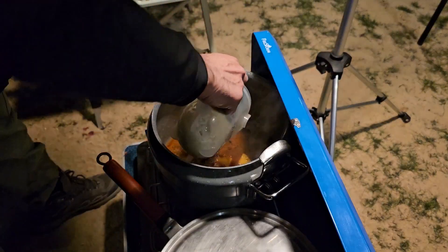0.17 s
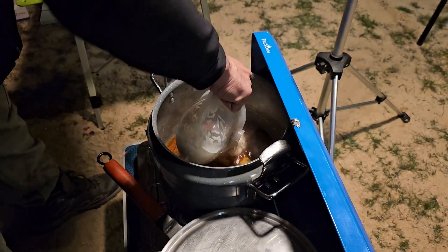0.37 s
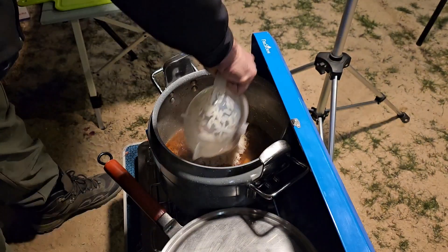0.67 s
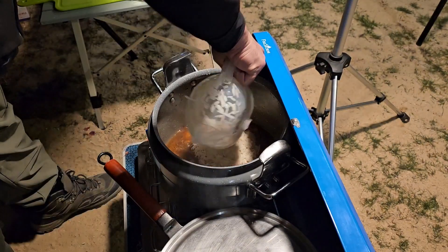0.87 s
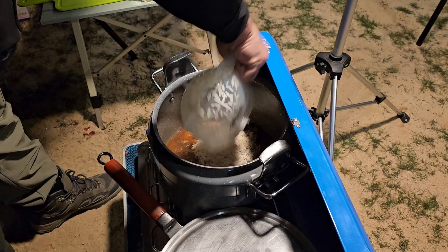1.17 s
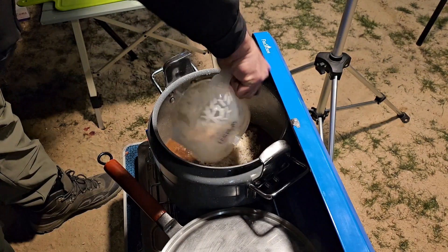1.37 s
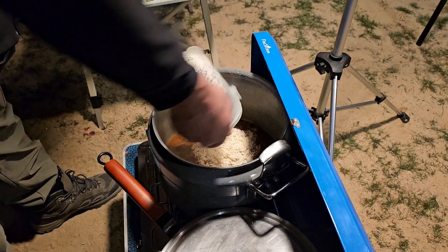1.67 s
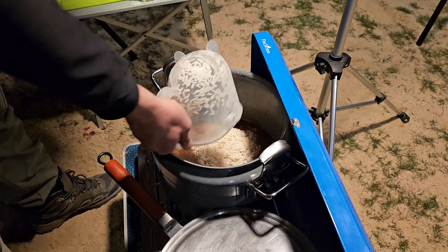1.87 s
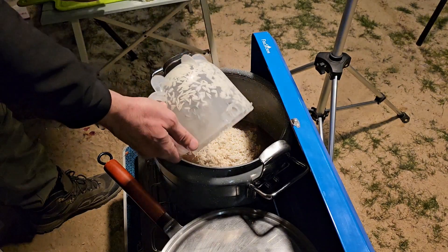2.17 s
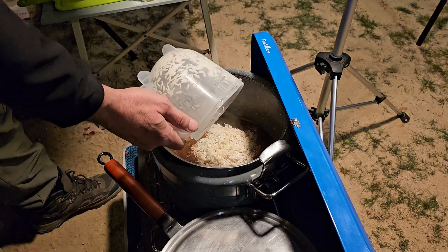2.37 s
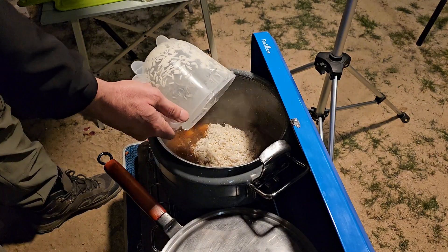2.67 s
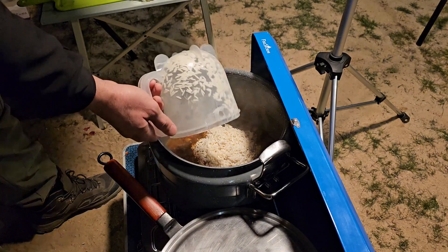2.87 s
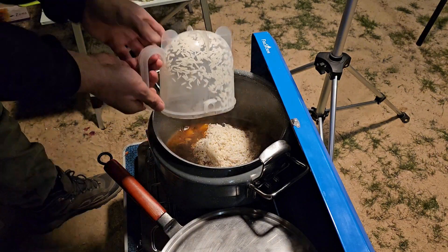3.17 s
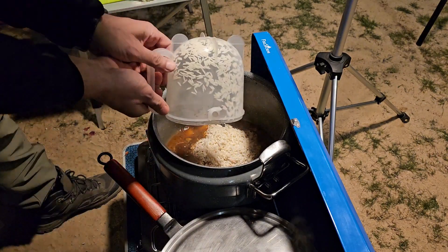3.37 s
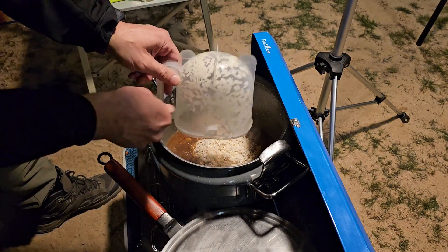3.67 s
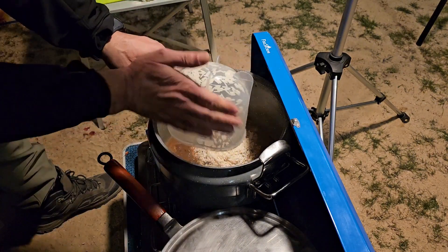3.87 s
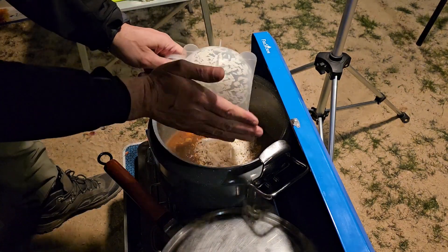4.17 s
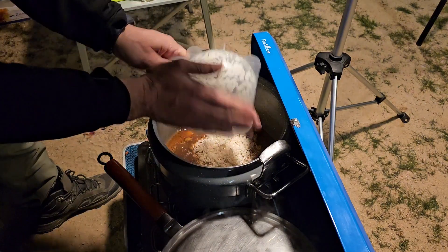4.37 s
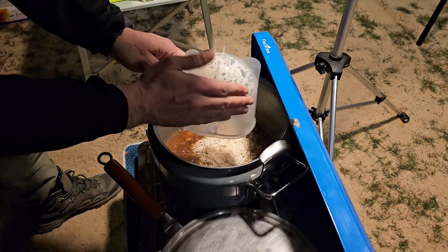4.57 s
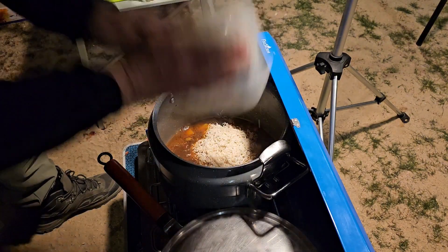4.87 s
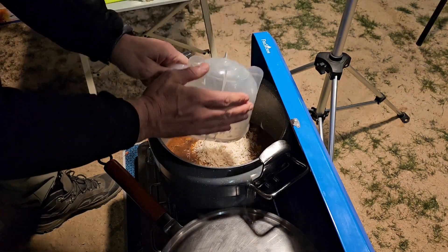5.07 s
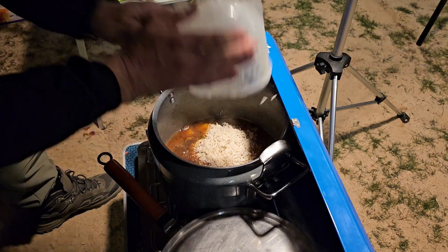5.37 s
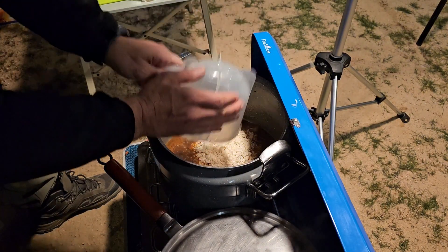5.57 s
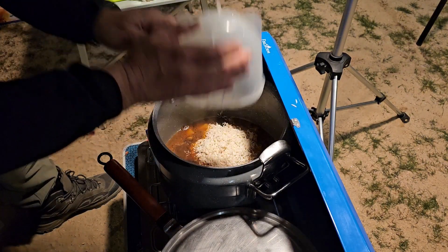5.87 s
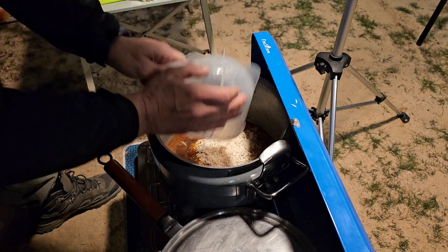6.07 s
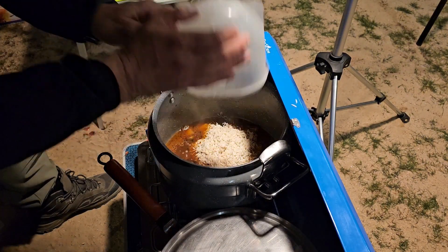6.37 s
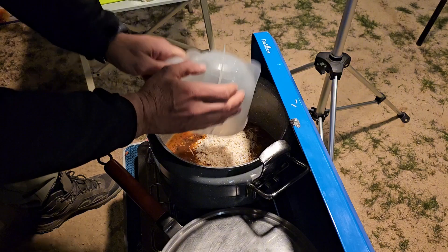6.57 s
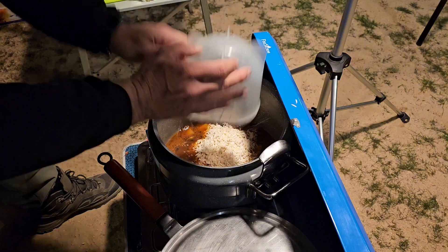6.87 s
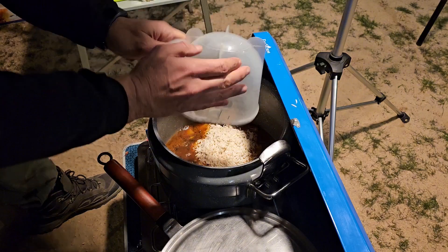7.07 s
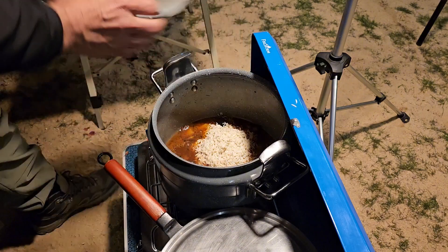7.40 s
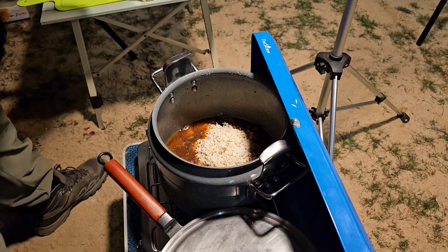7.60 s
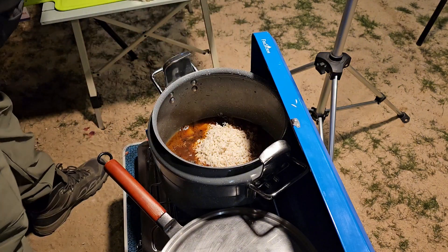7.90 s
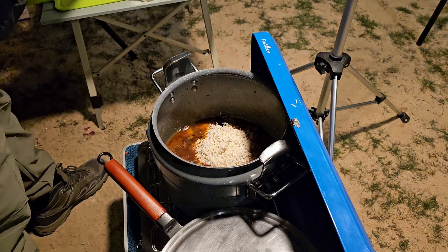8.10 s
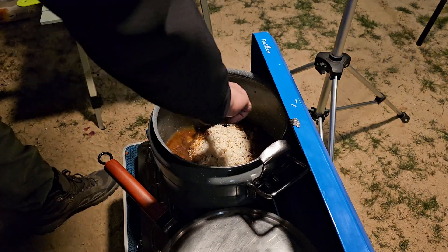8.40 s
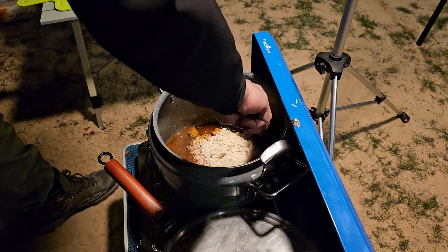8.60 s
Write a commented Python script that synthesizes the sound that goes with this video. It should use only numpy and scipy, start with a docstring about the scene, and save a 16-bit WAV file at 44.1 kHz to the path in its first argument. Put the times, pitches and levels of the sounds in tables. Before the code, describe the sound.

Close up at an outdoor camp, stew simmers with thick plops and a faint fizz. A plastic jug knocks loudly against the pot, setting it ringing, and wet rice drops in softly. The jug's handle creaks, then a palm slaps its base four times. Sleeves swish as it is shaken, and near the end a utensil clacks and clinks on the rim. A burner and a distant engine hum quietly underneath.

```python
"""An outdoor camp, a stereo microphone close to a simmering stew pot. Soaked rice goes in from a plastic
jug: the jug knocks the pot and sets it ringing, its handle creaks, and it is slapped four times on the
base and shaken. Wet rice and sleeves swish, thick bubbles plop, tiny ones fizz, and at the end a utensil
clinks on the rim. Underneath are the burner's steady flame and, far off, the hum of an engine."""
import sys
import numpy as np
from scipy import signal
from scipy.fft import rfft, irfft
from scipy.io import wavfile

SR = 44100
rng = np.random.default_rng(int(sys.argv[2]) if len(sys.argv) > 2 else 0)


def persist_wave(psi):
    """Save psi, clipped to +-1, as 16-bit WAV."""
    counts = np.round(np.clip(psi, -1, 1) * 32767).astype(np.int16)
    wavfile.write(sys.argv[1], SR, np.atleast_2d(counts).T)


N = 385434
T = np.arange(SR) / SR  # one second: the life of any single event


# jug against the pot, close up: t/s, thud level/dB, pot ring level/dB, crack level/dB
KNOCKS = [(0.4516, -1.5, -17.5, -21.5), (0.4592, -8, -46, -20.5)]
# modes of the full jug: f/Hz, level/dB, t60/s
FULL_JUG_MODES = [(258, -19, .06), (319, 0.5, 0.13), (478, 5, 0.024), (613.5, -4, 0.0954), (659, -17, 0.26),
                  (1786, -11, 0.088), (2040, -17, 0.16)]
# modes of the pot with stew in it: f/Hz, level/dB, t60/s
POT_MODES = [(266.5, 3, 0.93), (291, 4, 0.98), (517, -28, 1), (602, -5, 0.84), (650, 3.5, 0.4),
             (932, 4.5, 0.37), (995, -13.5, 0.46), (1032, 0.5, 0.61), (1190, -18, 0.25),
             (1370, -24.5, 0.89), (1518, -13.5, .37), (1571, -4, .49), (1830, -14, .7), (2093, -27, .31),
             (2160, -4.5, 0.21), (2705, -6.5, .31), (3074, -11, 0.47)]

def jug_knocks(split=0.026):
    """The full jug hits the pot and rebounds; the pot, not quite round, rings in close pairs of modes."""
    out = np.zeros((2, N))
    twins = [(hz * (1 + split * rng.uniform(-1, 1)), db + 1, t60 * 0.61) for hz, db, t60 in POT_MODES]
    for s, thud_db, ring_db, crack_db in KNOCKS:
        thud = gain_of(thud_db) * ring(FULL_JUG_MODES, rise=0.0008)
        pot = gain_of(ring_db) * ring(POT_MODES + twins, rise=0.003)
        snap = gain_of(crack_db) * crack(0.0089, after_db=-13, after_fall=0.013, tilt_db=0.1)
        add(out, s, radiated(radiated(thud + pot, 170), 170) + snap)
    return out


# palm on the jug's base: t/s, thump level/dB, wall level/dB re thump, crack level/dB
SLAPS = [(3.8567, -8, -14, -23), (4.0363, -4, -11, -15.5), (4.1976, -6.5, -6, -18), (4.3632, -5, -3.5, -16)]
# air in the jug and its base, damped by the palm: f/Hz, level/dB, t60/s
JUG_AIR_MODES = [(325, 0, 0.042)]
# the jug's walls: f/Hz, level/dB, t60/s
JUG_WALL_MODES = [(421, -24, 0.047), (482, 12.5, 0.034), (508, -3, 0.021), (664, -7, 0.096),
                  (798, -6, 0.093), (1864, -28, 0.16), (2946, -7, 0.028), (2800, -33, 0.045)]

def palm_slaps():
    """The palm drives the air and walls of the upturned jug; the pot's lowest modes answer faintly."""
    out = np.zeros((2, N))
    for s, db, wall_db, crack_db in SLAPS:
        air = ring(JUG_AIR_MODES, rise=0.004, sag=0.2, sag_s=0.021)  # flat while the palm presses
        walls = gain_of(wall_db) * ring(JUG_WALL_MODES, rise=0.0032)
        pot = gain_of(-34) * ring(POT_MODES[:5], rise=0.0053)
        recoil = gain_of(-20.5) * ring([(80.5, 0, 0.075)], rise=0.0042)  # the whole jug gives way
        thump = -gain_of(db) * (radiated(air + walls + pot, 193) + recoil)
        smack = gain_of(crack_db) * inside_pot(crack(0.0033, after_db=-11.5, after_fall=0.015))
        add(out, s, thump + smack)
        add(out, s - 0.005, gain_of(db - 23) * air)  # air squeezed ahead of the palm
    return out


# loose rice sliding over the jug's lip: t/s, level/dB
SLIDES = [(.168, -50), (.28, -47.5)]
# wet clumps landing in the pot: t/s, level/dB, fall/s
CLUMPS = [(1.089, -50, 0.015), (1.112, -33.5, .011), (1.247, -41, 0.032), (1.294, -43, 0.0096),
          (1.399, -52, .016), (3.912, -44, 0.017), (4.133, -40.5, 0.014), (4.17, -34, 0.042),
          (4.315, -42, 0.051), (4.493, -47.5, 0.0072), (4.905, -44, 0.042), (5.487, -40, 0.026),
          (5.998, -29.5, 0.018), (6.5, -45, .014), (6.86, -50.5, .012), (7.256, -43, 0.011)]
# a sleeve brushing as the arm swings: t/s, level/dB
SLEEVE_SWINGS = [(0.629, -57.5), (0.808, -57.5), (3.14, -61.5), (4.959, -49.5), (5.48, -54), (6.0, -55.5),
                 (6.48, -62), (6.831, -60.5), (7.75, -60.5), (8.54, -53)]
# spectrum of rice and cloth slipping: f/Hz, level/dB
SWISH_SPECTRUM = [(300, -30.5), (1100, -4.5), (1700, -3.5), (3200, 6.5), (5500, 5.5), (8500, 2),
                  (12000, -1.5), (15500, -2.5)]

def rice_and_sleeves(pour_from_s=1.02, pour_to_s=1.45, crumb_count=10, ticks_per_s=500):
    """Each slide, splat or swing is a cloud of tiny slips; loose grains tick on the pot and ring it."""
    swishes, lead_s = np.zeros((2, N)), 0.35
    crumbs = [(pour_from_s + (pour_to_s - pour_from_s) * (k + when) / crumb_count, -54.5 + 4 * size, 0.009)
              for k, (when, size) in enumerate(rng.random((crumb_count, 2)))]
    # heavier clumps are brighter
    splats = [(s, db, 0.0041, fall, 5 + 0.38 * (db + 31.5)) for s, db, fall in CLUMPS + crumbs]
    swings = [(s, db, 0.079, 0.056, -1.5) for s, db in SLEEVE_SWINGS]
    slides = [(s, db, 0.021, 0.036, 4.5) for s, db in SLIDES]
    for s, db, rise, fall, tilt_db in slides + splats + swings:
        hiss = noise(SWISH_SPECTRUM, ALIKE_NEAR, size=SR, tilt_db=tilt_db)
        add(swishes, s - lead_s, gain_of(db) * swell(T - lead_s, rise, fall) * hiss)
    force = gain_of(4 * np.minimum(rng.exponential(1, N), 3))  # a few grains hit much harder
    hits = swishes.mean(0) * evened(force * (rng.random(N) < ticks_per_s / SR))
    wall = ring([(1623, 2.5, 0.053), (2710, -4, 0.24), (3360, 2.5, 0.098), (5015, 5.5, 0.073)])
    ticks = signal.oaconvolve(hits[None], wall / np.linalg.norm(wall[0]), axes=1)[:, :N]
    grit = evened(gain_of(0.83 * drift(900) + 1.8 * drift(70)))
    return inside_pot(swishes * grit) + gain_of(-7) * (ticks + hits)


# modes of a hollow clack: f/Hz, level/dB, t60/s
CLACK_MODES = [(225, -6, 0.25), (586, -6, 0.071), (795, -7, .09), (1036, 1, 0.094), (1123, 3.5, 0.18),
               (1240, -5, 0.11)]
# utensil on the rim: t/s, ring level/dB, chatter level/dB
CLINKS = [(8.1772, -16, -34.5), (8.1827, -27, -35.5)]
# modes of utensil and rim: f/Hz, level/dB, t60/s
RIM_MODES = [(886, -18.5, 0.53), (1070, -18, 0.4), (1580, -2, 0.23), (1630, -11, 0.3), (1798, 5, 0.074),
             (1852, 7, 0.073), (2100, 3.5, 0.14), (2460, -1.5, 0.069), (2600, -9, 0.15), (3020, -4.5, 0.17),
             (3550, -13, 0.17)]

def utensil(clack_at_s=8.0995):
    """A hollow rattling clack that stops dead, then a double clink on the rim."""
    out = np.zeros((2, N))
    rattle = gain_of(-28) * noise(SCUFF_SPECTRUM, ALIKE_NEAR, size=SR, tilt_db=1.5) * np.exp(-T / 0.036)
    tick = gain_of(-18) * ring([(3300, -0.16, 0.0067), (3800, 0, 0.013), (4580, -2, 0.012)], rise=0.0001)
    clack = gain_of(-17.5) * ring(CLACK_MODES, rise=0.0027)
    snap = gain_of(-40) * crack(0.002, after_db=-17, after_fall=0.02, tilt_db=14)
    dead_stop = np.clip((0.043 - T) / 0.0017, 0, 1)
    add(out, clack_at_s, (clack + rattle + tick + snap) * dead_stop)
    spectrum = [(400, -15.5), (900, -2.5), (1300, -9), (1850, -6.5), (3000, -9), (6000, -17.5),
                (15000, -40)]  # f/Hz, level/dB
    fade = np.exp(-T / 0.012) + gain_of(-16) * np.exp(-T / 0.14)
    for s, ring_db, chatter_db in CLINKS:
        chatter = gain_of(chatter_db) * noise(spectrum, ALIKE_NEAR, size=SR) * fade
        add(out, s, gain_of(ring_db) * ring(RIM_MODES, rise=0.00056) + chatter)
    return out


# the jug's handle as the grip changes: t/s, creak level/dB, snap level/dB
CREAKS = [(2.55, -48, -36.5), (2.66, -35.5, -28.5), (2.721, -37, -60), (2.778, -41.5, -62),
          (2.813, -44.5, -60)]
# jug and gear moved beside the pot: t/s, level/dB, rise/s, fall/s, tilt/dB per octave
SCRAPES = [(.622, -40.5, .012, 0.04, -3.5), (7.046, -32, 0.003, 0.046, 0), (7.165, -39.5, 0.03, 0.081, -2),
           (8.503, -52.5, .003, 0.42, 2)]

def handling():
    """The knocked pot shudders and settles, the jug's handle snaps and creaks, and gear scrapes."""
    out = np.zeros((2, N))
    shudder = rub(-32.5, rise=0.0067, fall=0.03, tilt_db=-1.5, flex_db=-3.5)
    settle = rub(-39, rise=0.008, fall=0.12, tilt_db=-5.5)
    add(out, KNOCKS[0][0] + 0.025 - RUB_LEAD_S, shudder + settle)
    for s, db, snap_db in CREAKS:
        add(out, s - RUB_LEAD_S, rub(db, rise=0.0042, fall=0.02, tilt_db=2, flex_db=-4))
        add(out, s, gain_of(snap_db) * crack(0.0014))
    for s, db, rise, fall, tilt_db in SCRAPES:
        add(out, s - RUB_LEAD_S, rub(db, rise, fall, tilt_db))
    return out


# spectrum of a dull scuff: f/Hz, level/dB
SCUFF_SPECTRUM = [(60, -40), (150, 3.5), (290, 9), (480, 3), (800, 3), (1150, -5.5), (1700, -4),
                  (3000, -9.5), (6000, -15.5), (15000, -29)]
# spectrum of the plastic handle flexing: f/Hz, level/dB
FLEX_SPECTRUM = [(500, -31.5), (950, -16.5), (1100, 6.5), (1230, -3.5), (1500, -12), (3000, -31.5),
                 (15000, -58)]
RUB_LEAD_S = 0.1

def rub(db, rise, fall, tilt_db, flex_db=-20):
    """A gritty rub with the tone of flexing plastic; it peaks RUB_LEAD_S after its start."""
    grit = evened(gain_of(2.8 * drift(173, size=SR)))
    scuff = noise(SCUFF_SPECTRUM, ALIKE_NEAR, size=SR, tilt_db=tilt_db)
    flex = gain_of(flex_db) * noise(FLEX_SPECTRUM, ALIKE_NEAR, size=SR)
    return gain_of(db) * swell(T - RUB_LEAD_S, rise, fall) * grit * (scuff + flex)


# spectrum of a hard contact, close up: f/Hz, level/dB
CRACK_SPECTRUM = [(150, -33.5), (500, -6.5), (1200, -2.5), (2800, 2), (4200, -3), (6000, -4), (8500, -9.5),
                  (12000, -16), (15500, -13.5)]

def crack(fall, after_db=-18, after_fall=0.014, tilt_db=0):
    """The noisy snap of contact, and its short scatter inside the pot."""
    shape = np.exp(-T / fall) + gain_of(after_db) * np.exp(-T / after_fall)
    return noise(CRACK_SPECTRUM, ALIKE_NEAR, size=SR, tilt_db=tilt_db) * shape


# the thickest bubbles bursting in the stew: t/s, level/dB
PLOPS = [(0.392, -40.5), (1.871, -36.5), (2.474, -40), (2.993, -39), (3.161, -35.5), (4.835, -40.5),
         (5.229, -35.5), (5.441, -37.5), (5.477, -34), (5.904, -37.5), (5.964, -37), (6.472, -35.5)]
# modes of the air in the pot: multiple of the pitch, level/dB, t60/s
POT_AIR_MODES = [(1.001, 7, 0.077), (1.8, -5, 0.068), (2.75, -8.5, 0.1), (4.401, -15.5, 0.057),
                 (6.1, -26.5, 0.26)]

def plops(pitch_hz=291.6, soft_count=12, soft_db=-42.5):
    """Thick bubbles tear their skin and ring the air in the pot; softer ones come at random."""
    out = np.zeros((2, N))
    soft = [((k + when) / soft_count * N / SR, soft_db + 4 * (force - 0.5))
            for k, (when, force) in enumerate(rng.random((soft_count, 2)))]
    for s, db in PLOPS + soft:
        modes = np.array(POT_AIR_MODES) + rng.standard_normal((len(POT_AIR_MODES), 3)) * [0.05, 2, 0]
        tear = noise(SCUFF_SPECTRUM, ALIKE_NEAR, size=SR, tilt_db=-9.5) * np.exp(-T / 0.0027)
        add(out, s, gain_of(db) * (ring(modes, pitch_hz, rise=0.0027) + gain_of(-13) * tear))
    return out


# the clearest small bubbles: t/s, level/dB, f/Hz
BUBBLES = [(1.464, -52, 1770), (2.198, -51, 4100), (2.995, -57, 1410), (4.975, -48.5, 1620),
           (5.125, -52.5, 2170), (7.342, -49.5, 4950), (7.37, -51.5, 1590), (7.627, -49.5, 1640),
           (7.97, -52, 2180), (8.417, -53.5, 2100), (8.5, -48.5, 2160)]

def simmer(faint_count=110, faint_db=-60.5, faint_hz=2200, fade_cycles=67):
    """Small bubbles burst in soft, narrow-band puffs; the large, low ones last longer."""
    out, t = np.zeros((2, N)), T[:SR // 5]
    hz = np.fft.rfftfreq(len(t), 1 / SR)
    times = rng.random(faint_count) * N / SR
    chance = np.clip(rng.standard_normal((faint_count, 2)), -2, 2)
    faint = [(s, faint_db + 3 * force, faint_hz * 2 ** (0.37 * height))
             for s, (force, height) in zip(times, chance)]
    for s, db, centre_hz in BUBBLES + faint:
        band = 1 / (1 + ((hz - centre_hz) / 380) ** 2)
        puff = evened(irfft(rfft(rng.standard_normal((2, len(t)))) * band, len(t)))
        shape = np.exp(-t * centre_hz / fade_cycles) * (1 - np.exp(-t / 0.001))
        add(out, s, gain_of(db) * puff * shape)
    return out


# the fizz as the rice goes in and stirs up the stew: t/s, relative level/dB
FIZZ_LEVELS = [(0.0, -63.5), (.2, -55.5), (.38, -56), (.9, -63.5), (1.24, -59), (1.55, -64), (2.1, -64.5),
               (3.6, -59.5), (4.05, -53.5), (4.499, -63), (7.8, -61.5), (8.3, -59), (8.74, -58)]
# spectrum of the fizz: f/Hz, level/dB
FIZZ_SPECTRUM = [(400, -33), (1300, -1), (2400, 0), (4000, -2.5), (7000, -3.5), (10000, -9), (15500, -17.5)]

def fizz(pops_per_s=260):
    """Countless tiny bubbles at the hot wall swell and ease; the nearest crackle singly."""
    level = gain_of(np.interp(np.arange(N) / SR, *np.transpose(FIZZ_LEVELS)) - 3.5 + 2.8 * drift(17))
    pops = gain_of(4 * np.minimum(rng.exponential(1, N), 4)) * (rng.random(N) < pops_per_s / SR)
    crackle = evened(signal.oaconvolve(pops, np.exp(-T / 0.00026))[:N])
    return level * (1 + gain_of(-7) * crackle) * noise(FIZZ_SPECTRUM, ALIKE_FAR)


# standing waves between the pot's walls: f/Hz, width/Hz, level/dB re the direct sound
STANDING_WAVES = [(1608, 12, -11), (1790, 25, 4), (2720, 20, -4), (3100, 17, 1.5), (4500, 100, -3),
                  (5190, 34, 3.5), (5460, 79, 1.5), (6150, 110, -2), (6400, 59, -9.5), (7010, 67, 0),
                  (7440, 55, -0.5), (8500, 17, -8.5), (11650, 200, 3)]

def inside_pot(x):
    """Sounds made inside the pot pick up its standing waves."""
    return x + sum(gain_of(db) * signal.lfilter(*signal.iirpeak(hz, hz / width, SR), x)
                   for hz, width, db in STANDING_WAVES)


# decay of the reflections around the camp: f/Hz, t60/s
CAMP_DECAY = [(100, .25), (300, 0.31), (1000, 0.27), (4000, 0.1), (15000, 0.12)]

def camp_scatter(x, echoes_per_s=3000):
    """Gear standing around throws a short scatter back to the microphone."""
    taps = rng.standard_normal((2, SR)) * (rng.random((2, SR)) < echoes_per_s / SR) * (T > 0.006)
    hz, t, spectra = signal.stft(taps, SR, nperseg=256)
    fade = gain_of(-60 * t / read(CAMP_DECAY, hz)[:, None])
    tail = signal.istft(spectra * fade, SR, nperseg=256)[1]
    return signal.fftconvolve(x, tail / np.linalg.norm(tail[0]), axes=1)[:, :N]


# spectrum of the burner and the night air: f/Hz, level/dB
BURNER_SPECTRUM = [(10, -28), (24, -4.5), (45, -8), (76, -1.5), (120, -9), (167, -17), (209, -14.5),
                   (280, -9), (350, -26.5), (520, -20.5), (800, -25), (1300, -35.5), (4000, -43.5),
                   (15800, -37.5)]

def burner():
    """The flame under the pot makes a low, nearly steady rush."""
    return gain_of(-54 + 0.32 * drift(12)) * noise(BURNER_SPECTRUM, ALIKE_FAR)


# orders of the engine, far from the microphone: f/Hz, level/dB
ENGINE_ORDERS = [(39.5, -54.5), (52.6, -54), (79, -63), (105, -66), (132, -61.5), (158, -62.5),
                 (184.5, -72.5)]

def far_engine():
    """The engine's orders waver together in pitch and separately in level."""
    clock = np.arange(N) / SR + np.cumsum(0.00763 * drift(1.53)) / SR
    hum = np.zeros(N)
    for hz, db in ENGINE_ORDERS:
        level = gain_of(db) * np.sqrt(2) * (1 + 0.3 * drift(5.5))
        hum += level * np.sin(2 * np.pi * (hz * clock + rng.random()))
    return hum


# close sounds at the microphone: f/Hz, left-right likeness
ALIKE_NEAR = [(300, 0.97), (700, 0.77), (1400, 0.65), (3000, 0.067), (15000, 0.068)]
# distant or spread-out sounds: f/Hz, left-right likeness
ALIKE_FAR = [(60, 0.93), (290, 0.94), (640, 0.74), (1410, 0.34), (3100, 0.19), (15000, 0)]

def noise(spectrum, alike, size=N, tilt_db=0):
    """Coloured stereo noise of rms 1, its sides alike in the bass; tilt_db is per treble octave."""
    hz = np.fft.rfftfreq(size, 1 / SR)
    left, other = rfft(rng.standard_normal((2, size)))
    same = np.clip(read(alike, hz), -1, 1)
    right = same * left + np.sqrt(1 - same ** 2) * other
    colour = gain_of(read(spectrum, hz) + tilt_db * np.log2(1 + hz / 500))
    return evened(irfft(np.array([left, right]) * colour, size))


def ring(modes, pitch=1, rise=0.00051, sag=0, sag_s=1):
    """Dying modes (f/Hz, level/dB, t60/s), summed to peak 1; they start flat by the share sag."""
    hz, db, t60 = np.transpose(modes)[:, :, None]
    # higher modes differ more in phase between left and right
    apart = rng.choice([-1, 1], hz.shape) * np.minimum(hz * pitch / 2800, 1) * np.pi / 4
    fade = gain_of(db - 60 * T / t60) * (1 - np.exp(-T / rise))
    clock = T - sag * sag_s * (1 - np.exp(-T / sag_s))
    phase = 2 * np.pi * hz * pitch * clock
    out = np.array([(fade * np.sin(phase + side * apart)).sum(0) for side in (1, -1)])
    return out / abs(out).max()


def radiated(x, hz):
    """A small body sends out little below its lowest mode."""
    return signal.sosfilt(signal.butter(2, hz, "high", fs=SR, output="sos"), x)


def swell(t, rise, fall):
    """Grows up to t = 0 and dies away after it."""
    return np.exp(np.minimum(t / rise, -t / fall))


def drift(per_s, size=N):
    """Smooth chance of rms 1, changing about per_s times a second."""
    hz = np.fft.rfftfreq(size, 1 / SR)
    return evened(irfft(rfft(rng.standard_normal(size)) / (1 + (hz / per_s) ** 4), size))


def gain_of(db):
    """Decibels to gain."""
    return 10 ** (np.asarray(db) / 20)


def evened(x):
    """Scales to rms 1."""
    return x / np.sqrt(np.mean(x ** 2) + 1e-20)


def read(points, hz):
    """Reads a table on a log-frequency axis."""
    f, value = np.transpose(points)
    return np.interp(np.log(hz + 1), np.log(f + 1), value)


def add(mix, s, sound):
    """Mixes a stereo sound in at time s, dropping what lies outside the mix."""
    start = round(s * SR)
    sound = sound[:, max(-start, 0):]
    part = mix[:, max(start, 0):][:, :sound.shape[1]]
    part += sound[:, :part.shape[1]]


def scene():
    """The pot close up, its faint scatter from the camp, and the engine and burner behind."""
    near = palm_slaps() + jug_knocks() + utensil() + handling() + plops() + rice_and_sleeves()
    near += inside_pot(simmer() + fizz())
    return near + gain_of(-27.5) * camp_scatter(near) + far_engine() + burner()


# balance of the microphone's two sides: f/Hz, left minus right level/dB
LEFT_BALANCE = [(60, 0.5), (200, 2.5), (2400, 2.5), (4400, 3.5), (8100, 4), (15000, 9)]

def record(dry, edge_hz=16100):
    """The microphone's left side is louder and brighter; peaks clip at full scale, then the top is cut."""
    left_db = read(LEFT_BALANCE, np.fft.rfftfreq(N, 1 / SR))
    balanced = irfft(rfft(dry) * gain_of(np.array([left_db, -left_db]) / 2), N)
    lowpass = signal.firwin(301, edge_hz, window=("kaiser", 9), fs=SR)
    return signal.oaconvolve(np.clip(balanced, -1, 1), lowpass[None], "same")


dry = scene()
out = record(dry)
persist_wave(out)
```